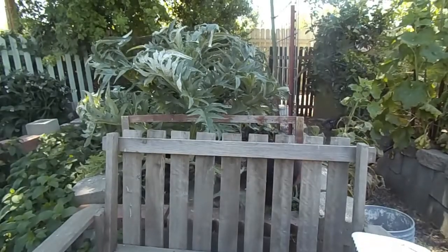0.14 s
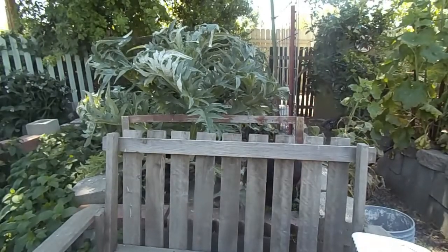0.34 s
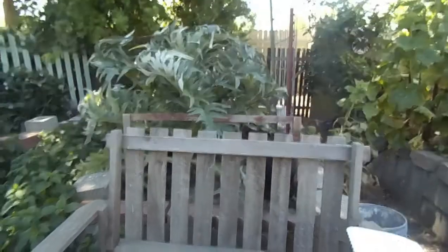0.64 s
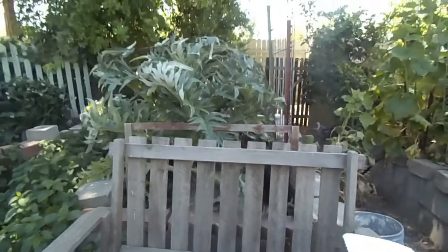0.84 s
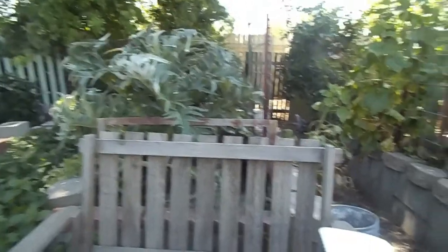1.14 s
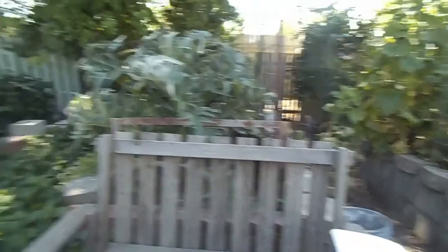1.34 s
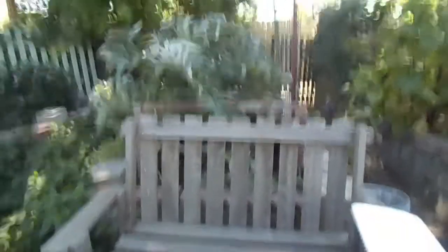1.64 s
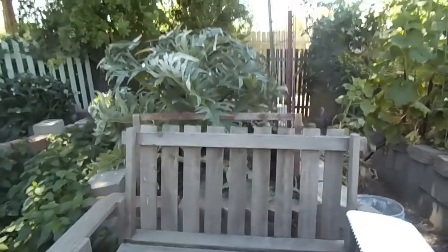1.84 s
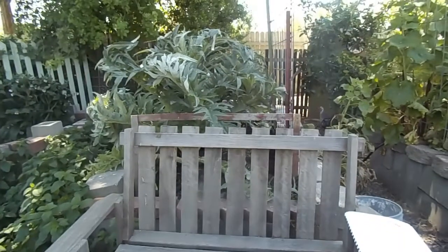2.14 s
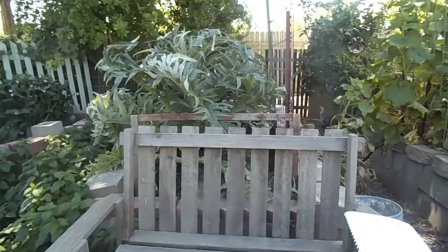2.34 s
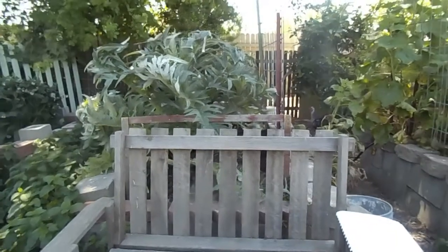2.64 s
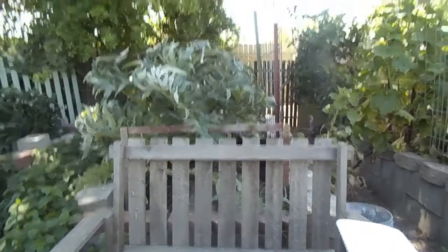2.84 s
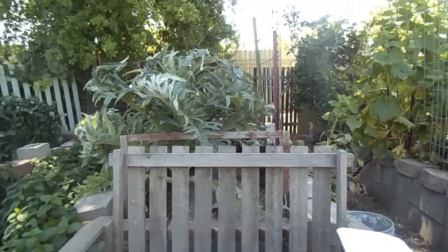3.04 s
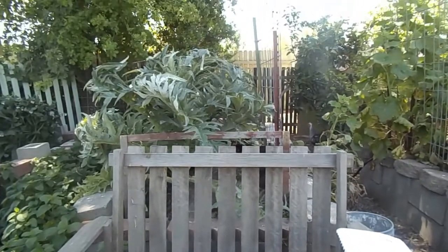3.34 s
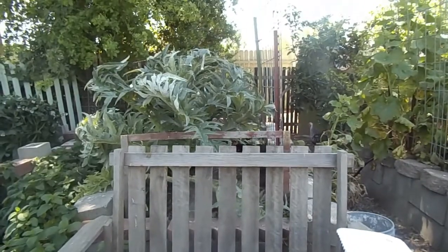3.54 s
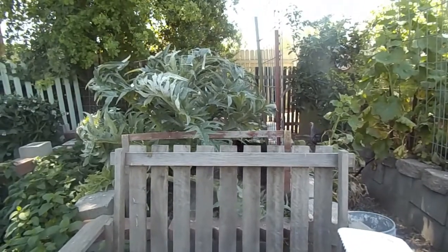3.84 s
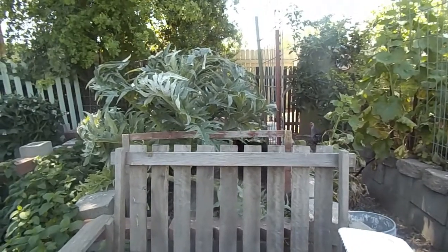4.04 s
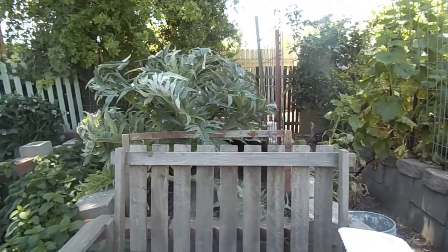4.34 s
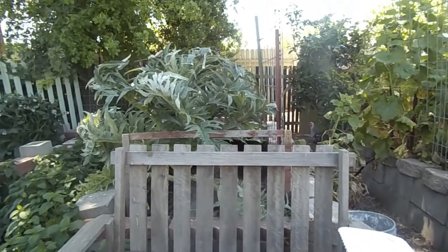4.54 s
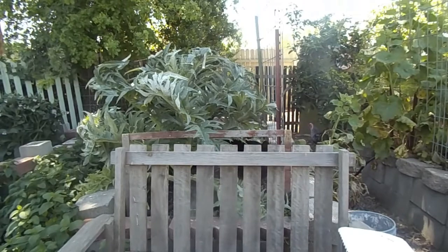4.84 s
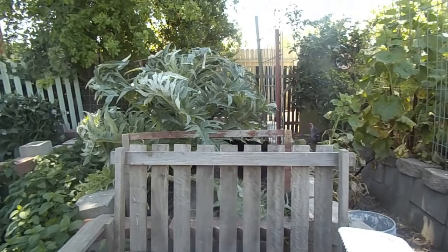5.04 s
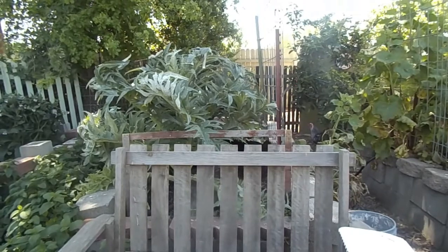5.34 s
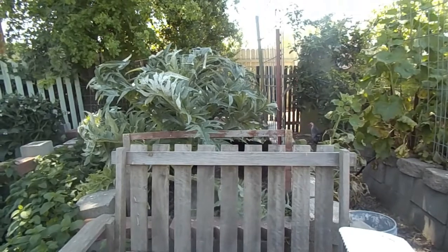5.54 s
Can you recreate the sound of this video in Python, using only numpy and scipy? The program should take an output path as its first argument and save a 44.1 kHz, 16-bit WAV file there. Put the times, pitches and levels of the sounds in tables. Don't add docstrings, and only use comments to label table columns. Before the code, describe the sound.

In a small fenced garden, a hen gives four quickening clucks, then a loud squawk near one second. Handling knocks, thumps and rubbing crowd the microphone around 1.5 seconds. More clucks follow at a steady pace, growing firmer, up to a second long squawk at about 4.6 seconds, then near quiet and one weak cluck. Soft distant traffic hum, leaf hiss and short wall echoes.

```python
import sys
import numpy as np
from scipy import signal
from scipy.io import wavfile
from scipy.ndimage import uniform_filter1d

SR = 44100
rng = np.random.default_rng(int(sys.argv[2]) if len(sys.argv) > 2 else 0)


def ratio_of_db(decibels):
    return 10 ** (np.asarray(decibels, float) / 20)


def waveform_to_disk(signal):
    frames = np.transpose(np.atleast_2d(signal))
    scaled = np.clip(frames, -1, 1) * 32767
    samples = np.round(scaled).astype(np.int16)
    wavfile.write(sys.argv[1], SR, samples)


N = 251370

# (frequency [Hz], level [dB])
HUM_SPECTRUM = [(15, -47), (25, -12), (64, -9), (195, -13), (439, -3), (503, -2.5), (1070, 0.5),
                (1440, -16), (1840, -2), (2160, -11), (3920, -16), (14800, -20.5), (16000, -25)]
HUM_DB, LEAVES_DB, WIND_DB, RUB_DB = -56, -69.5, -83.5, -80
# (peak time [s], rise [s], fall [s], level above calm [dB])
WIND_GUSTS = [
    (.55, 0.12, .55, 24.5),
    (1.55, 0.31, .28, 28.5),
    (1.95, 0.22, 0.72, 25),
    (3.7, 0.63, 0.089, 3),
]
# (peak time [s], rise [s], fall [s], level above calm [dB])
LEAF_SHIVERS = [
    (1.47, .9, 0.17, 5),
    (3.7, 0.29, 0.09, 19.5),
    (2.4, 0.2, 2.3, -19),
    (5.54, 0.95, 0.32, -13),
]
# (peak time [s], rise [s], fall [s], level above calm [dB])
SKIN_RUBS = [
    (1.54, 0.059, .04, 39),
    (1.61, 0.067, 0.084, 34.5),
    (2.58, 0.019, .03, 25),
    (3.7, 0.052, 0.11, 28),
]

# (time [s], peak level [dB], frequency [Hz])
GRIP_THUMPS = [(0.409, -45, 316), (0.533, -38, 133.8), (0.598, -41, 297), (0.779, -41, 212),
               (1.02, -36, 202), (1.349, -48, 79.4), (1.543, -35, 196), (1.553, -25.5, 299),
               (1.59, -29, 183), (1.607, -44, 290), (1.87, -34.5, 183), (1.91, -36.5, 169),
               (1.959, -43, 129.6), (2.098, -42, 153), (2.18, -41.5, 116), (2.557, -58, 239),
               (3.282, -35, 119), (3.4, -48, 290.3)]
# (time [s], peak level [dB], hollow ring [dB], high ring [dB], crack [dB])
LONE_KNOCKS = [(0.157, -32.5, -40, 6.5, -16), (0.41, -38.5, 2, -3.5, 7), (0.5293, -35, 5, 4, -23),
               (1.0244, -29.5, -5, -4, -10), (2.295, -31.5, -36, 1.5, -32), (2.39, -39.5, -26, 4.5, 15.5),
               (2.4076, -48, -11, 10, -27), (2.5094, -37, -14, 1.5, -6), (2.5525, -23, -25, -6.5, -13),
               (2.5735, -22, -7, 1.5, -3), (2.6366, -25, -36, -12, -35), (3.1792, -44, -7, -2, -22),
               (3.274, -33, 2, 4.5, -16), (3.3991, -25.5, -2.5, 3.5, -18), (3.4306, -39, 3.5, 6.5, -9),
               (3.5316, -37.5, -4, 0, -18), (4.0164, -41.5, -12, -21, -4), (4.0402, -42, -24, -14, -20),
               (4.366, -35.5, -26, -14, -14), (5.035, -36.5, -5, -35, -29), (5.1148, -36.5, -17, -18, -16),
               (5.1416, -43, -6, -15, -9), (5.5573, -42, -11, -13, -19), (5.6702, -41, -8, -21, -18)]
# (time [s], peak level [dB], firmness of the hold [dB])
FUMBLE_KNOCKS = [(1.4326, -35, -10), (1.528, -30, -8), (1.538, -23, 2), (1.5503, -24, 5),
                 (1.5744, -23.5, -1), (1.5883, -24, -2.5), (1.6047, -23, -5), (1.6276, -32, 0),
                 (1.6531, -30.5, 19), (1.716, -37.5, 6), (1.7343, -39, 0), (1.7687, -47, -5)]
# hollow ring, high ring, crack [dB]
FUMBLE_PART_DB = [-10.5, -8, -14.5]
# hollow ring, high ring, crack [dB/dB]
HOLD_DAMPING = [0.79, 1, 0.89]
# (frequency [Hz], level [dB], t60 [s])
CASING_MODES = [
    [(1283, 2.5, 0.028), (1545, 6, 0.01), (1080, -47, 0.042)],
    [(523, -12.5, 0.041), (765, -4, 0.014), (333, -13, 0.012)],
    [(2900, 2.5, 0.012), (3460, -11, 0.022), (2310, -0.5, 0.011)],
]

# (time [s], pitch [Hz], level [dB])
FAR_HEN_NOTE = [
    (1.78, 456, -67),
    (1.82, 502, -69),
    (1.88, 530, -62.5),
    (1.96, 510, -69),
    (1.98, 505, -83),
]
# (time [s], pitch [Hz], level [dB], hoarseness [0-1.2])
BIRD_CALLS = [
    [(0, 4560, -63, 0.07), (.14, 4700, -67, 0.25), (.24, 4940, -61, 0.15), (.31, 5220, -59, 0.22),
     (.36, 5180, -78, 0.2)],
    [(5.178, 2460, -73, 0.96), (5.19, 2900, -48, 1), (5.205, 2900, -54, 1.18), (5.216, 4220, -56.5, 0.84),
     (5.232, 5840, -54, 0.7), (5.245, 6800, -70, 0.7)],
]

# (start [s], peak level [dB], highest second partial [Hz], beak opening [dB], half-pitch share [0-1])
CLUCK_CALLS = [(-0.012, -32, 1168, -6.5, 0.8), (0.243, -27, 1155, -12, 0.34),
               (0.4851, -26.5, 1113, -18, 0.24), (0.7144, -21.5, 1196, -2.5, 0.45),
               (1.977, -36, 1188, -0.5, 0.74), (2.4233, -31.5, 1161, 3.5, 1),
               (2.7267, -26.5, 1120, 2.5, .69), (2.974, -24.5, 1143, 2.5, 0.8),
               (3.2991, -25.5, 1128, 5, 0.41), (3.5544, -22, 1135, 9, 0.08), (3.8312, -25, 1137, 9, .42),
               (4.1201, -25.5, 1102, 4, 0.45), (4.463, -25, 1078, 1.7, 0.23), (5.5861, -38, 1154, -4, 0.2)]
# (share of length [0-1], pitch re highest [ratio], level [dB], extra level of upper bands [dB])
CLUCK_ARCH = [
    (0, .78, -18.5, -67),
    (0.117, .88, -6.5, -13),
    (0.347, 1, -2, -0.5),
    (.6, 1.005, 2, -2),
    (0.85, 0.96, -8.5, -1),
    (1, 0.757, -3.5, -3),
]
# (frequency [Hz], level [dB])
CLUCK_THROAT_DB = [(560, -23), (800, -10), (1120, 5), (1450, -1), (1700, -7), (1950, -5), (2250, 9),
                   (2800, -17), (3200, -18), (3600, -13), (4300, -35), (6000, -39), (10000, -42.5),
                   (15500, -55.5)]
CLUCK_BAND_EDGES_HZ = [1330, 1900, 2600, 4200]
# (level re peak [dB], per opening [dB/dB], at full half-pitch [dB], per effort [dB/dB])
CLUCK_UPPER_BANDS = [(-16, 0.31, 10.5, 0.44), (-10.5, 1.0, 0.5, 0), (-16, -0.06, 8, 0.6),
                     (-17, 0.09, 4.9, 1.6)]
CLUCK_S, FULL_EFFORT_DB = 0.054, -24.5
FIRM_ROUGH, ROUGH_PER_WEAK_DB, WEAK_DB = 0.09, 0.06, -30

# (time [s], pitch [Hz], level [dB], beak opening [dB], neck slack [dB])
SQUAWK_BODIES = [
    [(.827, 670, -24, 4, 4.5), (.837, 749, -18.5, -7.5, 2.5), (.874, 735.4, -23, -1, 5.5),
     (.91, 665.2, -19.5, -6.5, -3.5), (.965, 671, -21.5, -1.5, 0), (1.01, 677.7, -24, 5.5, -16),
     (1.055, 676.7, -27, 10, -7), (1.095, 700, -25, -5, 7), (1.12, 670, -29, 4.5, 4.5)],
    [(4.592, 667, -25.5, -0.5, 3.5), (4.61, 720.6, -24, 1.5, -4.5), (4.664, 666.5, -30, 4.5, 5),
     (4.7, 690.3, -18.5, 0, 5), (4.745, 659.3, -28, 2, -17), (4.796, 678.7, -26.5, 13.5, 4),
     (4.825, 689.5, -28, 7.5, 4.5), (4.862, 711.3, -28.5, -5, 8.5), (4.885, 700, -28, 4, 1)],
]
# (length [s], roughness [0-1], half-pitch share [0-1], roughness at snap [0-1], snap [s])
SQUAWK_RASPS = [
    (.066, .15, .17, .2, .018),
    (.072, .1, 1, .4, .009),
]
# (frequency [Hz], level [dB])
SQUAWK_THROAT_DB = [(340, -63), (680, -31.5), (1030, -12.5), (1360, -2), (1700, -20.5), (2050, -11.5),
                    (2400, -17.5), (2750, 10), (3050, -9), (3500, -9.5), (4500, -14), (6300, -14.5),
                    (9500, -18.5), (16200, -28.5)]
SQUAWK_EDGE_RATIOS = [1.7, 2.3, 3.65, 4.5, 5.5]
# (level re second partial [dB], per opening [dB/dB], per slack [dB/dB], at full half-pitch [dB])
SQUAWK_PARTIAL_BANDS = [(-22.5, 0.5, 1.01, 22), (-11, 1.0, 0.5, 8.5), (-13, 0, 1.5, 5),
                        (-16, 1.0, -0.24, -5), (-7.5, 0.2747, 0, -0.5)]
ONSET_S, ONSET_PITCH_RATIO, ONSET_DB = 0.022, 0.83, -27
FALL_S, FALL_BREAK_SHARE, FALL_PITCH_RATIO, FALL_BREAK_DB, FALL_DB = 0.035, 0.64, 0.71, -3.5, -28
ONSET_ROUGH, CLEAR_ROUGH, FALL_ROUGH, SETTLE_S = 0.6, 0.03, 0.35, 0.012

# (delay [s], level [dB])
YARD_ECHOES = [(0.012, -9.5), (0.025, -11.5), (0.035, -11), (0.045, -15.5), (0.061, -28), (.079, -22),
               (.1, -40.5), (0.123, -30)]
YARD_T60_S, YARD_DB, WALL_CUT_HZ = 0.5, -26, 5200
MIC_CUTOFF_HZ = 16050


def rms_one(x):
    return x / np.sqrt(np.mean(x ** 2) + 1e-20)


def peak_one(x):
    return x / np.abs(x).max()


def at_hz(points, hz):
    points_hz, points_db = np.array(points).T
    return np.interp(np.log(hz), np.log(points_hz), points_db)


def in_span(rows):
    s, *columns = np.transpose(rows)
    at = max(int(s[0] * SR), 0)
    t = np.arange(at, int(s[-1] * SR)) / SR
    return at, t, [np.interp(t, s, c) for c in columns]


def add(out, at, x):
    out[at:at + len(x)] += x[:len(out) - at]


def drift(rate_hz, size):
    r = np.exp(-2 * np.pi * rate_hz / SR)
    noise = rng.standard_normal(size + 4000)
    return rms_one(signal.lfilter([1], [1, -2 * r, r * r], noise)[4000:])


def band(x, low_hz, high_hz):
    return signal.sosfilt(signal.butter(2, [low_hz, high_hz], "band", fs=SR, output="sos"), x)


def noise_band(low_hz, high_hz):
    return rms_one(band(rng.standard_normal(N), low_hz, high_hz))


def ring(clicks, hz, t60_s):
    r, w = ratio_of_db(-60 / (t60_s * SR)), 2 * np.pi * hz / SR
    return signal.lfilter([0, np.sin(w)], [1, -2 * r * np.cos(w), r * r], clicks + 1e-18)


def swells(calm_db, rows):
    t = np.arange(N) / SR
    return calm_db + sum(np.interp(t, [s - rise, s, s + fall], [0, db, 0]) for s, rise, fall, db in rows)


def hum():
    out = np.zeros(N)
    edges_hz = 22 * 2 ** np.arange(0, 9.6, 0.5)
    white = rng.standard_normal((2, N))
    for k, (low, high) in enumerate(zip(edges_hz, edges_hz[1:])):
        flicker = np.repeat(drift(300, N // 50 + 1), 50)[:N]
        level_db = at_hz(HUM_SPECTRUM, np.sqrt(low * high)) + 1.5 * flicker
        out += ratio_of_db(level_db) * band(white[k % 2], low, high)
    return ratio_of_db(HUM_DB) * rms_one(out)


def background():
    leaves = ratio_of_db(swells(LEAVES_DB, LEAF_SHIVERS)) * noise_band(3000, 14700)
    wind = ratio_of_db(swells(WIND_DB, WIND_GUSTS) + 5.4 * drift(4.6, N)) * noise_band(18, 270)
    rub = ratio_of_db(swells(RUB_DB, SKIN_RUBS) + 4 * drift(90, N)) * noise_band(230, 2500)
    return hum() + leaves + wind + rub


def thumps():
    out, t = np.zeros(N), np.arange(int(0.08 * SR)) / SR
    for s, db, hz in GRIP_THUMPS:
        push = t / 0.0042 * np.exp(1 - t / 0.0023)
        add(out, int(s * SR), ratio_of_db(db - 2) * np.sin(2 * np.pi * hz * t) * push)
    return out


def knocks():
    out, t = np.zeros(N), np.arange(2000) / SR
    damping = np.array(HOLD_DAMPING)
    fumble = [(s, db, *(FUMBLE_PART_DB - hold_db * damping)) for s, db, hold_db in FUMBLE_KNOCKS]
    rows = LONE_KNOCKS + fumble
    chance = rng.standard_normal((len(rows), 3, 3, 2))
    for (s, db, low_db, high_db, crack_db), grips in zip(rows, chance):
        contact = rng.standard_normal(len(t)) * (np.exp(-t / 0.0012) + 0.18 * np.exp(-t / 0.0096))
        crack = rng.standard_normal(len(t)) * ratio_of_db(-60 * t / 0.012)
        tick = ratio_of_db(crack_db) * peak_one(band(crack, 4000, 18000))
        for modes, group_db, grip in zip(CASING_MODES, [0, low_db, high_db], grips):
            rings = np.zeros(len(t))
            for (hz, mode_db, t60_s), (tune, strength) in zip(modes, grip):
                rings += ratio_of_db(mode_db + 2 * strength) * ring(contact, hz * np.exp(0.03 * tune), t60_s)
            tick += ratio_of_db(group_db) * peak_one(rings)
        add(out, int(s * SR), ratio_of_db(db) * tick)
    return band(out, 440, 22000)


def far_hen():
    out = np.zeros(N)
    at, t, (hz, level_db) = in_span(FAR_HEN_NOTE)
    phase = 2 * np.pi * np.cumsum(hz * (1 + 0.017 * drift(60, len(t)))) / SR
    partials = sum(ratio_of_db(db) * np.sin(k * phase) for k, db in enumerate([-25, 8.5, 1.5, 1, 6.5], 1))
    add(out, at, ratio_of_db(level_db) * partials)
    return out


def small_bird():
    out = np.zeros(N)
    for rows in BIRD_CALLS:
        at, t, (hz, level_db, hoarse) = in_span(rows)
        phase = 2 * np.pi * np.cumsum(hz * (1 + 0.1 * hoarse * drift(400, len(t)))) / SR
        add(out, at, ratio_of_db(level_db) * (1 + hoarse * drift(300, len(t))) * np.sin(phase))
    return out


def syrinx(t, hz, bands_db, rough, half, throat, edges_hz, wander_db):
    hz = hz * (1 + 0.0016 * drift(55, len(t)) + 0.016 * rough * drift(270, len(t)))
    phase = np.pi * np.cumsum(hz) / SR
    groups = np.zeros((len(bands_db), len(t)))
    blur = [drift(91, len(t)) for _ in range(6)]
    for k in range(1, int(32400 / np.median(hz))):
        partial_hz = k * hz / 2
        shake_db = wander_db * np.sin(2 * np.pi * (rng.uniform(4, 12) * t + rng.random()))
        strength = ratio_of_db(at_hz(throat, partial_hz) + shake_db) * (partial_hz < 16200)
        if k % 2:
            strength = strength * half
        spread = 2 * np.pi if k < 11 else 2.0
        jitter = (1.4 * rough + (0.014 + 0.22 * rough) * k) * blur[k % 6]
        wave = np.sin(k * phase + spread * rng.random() + jitter)
        partial = strength * (1 + 1.4 * rough * blur[(k + 3) % 6]) * wave
        above = [1] + [np.clip((partial_hz / e - 1) * 8 + 0.5, 0, 1) for e in edges_hz] + [0]
        for g in range(len(groups)):
            groups[g] += (above[g] - above[g + 1]) * partial
    groups /= np.sqrt(uniform_filter1d(groups ** 2, size=700, axis=1) + 1e-9)
    edge = np.clip(np.minimum(t - t[0], t[-1] - t) / 0.0019, 0, 1)
    return edge * np.sum(ratio_of_db(np.array(bands_db)) * groups, axis=0)


def cluck(s, db, hz, beak_db, half):
    arch = [(s + CLUCK_S * share, *rest) for share, *rest in CLUCK_ARCH]
    at, t, (bend, level_db, late_db) = in_span(arch)
    level_db = level_db + db - 4.0
    effort_db = min(db - FULL_EFFORT_DB, 0)
    half = np.clip(half, 0, 1)
    bands_db = [level_db]
    for k, (base, opens, halves, push) in enumerate(CLUCK_UPPER_BANDS):
        band_db = base + opens * beak_db + halves * half + push * effort_db
        bands_db.append(level_db + band_db + 0.71 * k * late_db)
    rough = FIRM_ROUGH + ROUGH_PER_WEAK_DB * max(WEAK_DB - db, 0)
    voice = syrinx(t, bend * hz / 2, bands_db, rough, half, CLUCK_THROAT_DB, CLUCK_BAND_EDGES_HZ, wander_db=5.5)
    return at, voice


def squawk(body, rasp):
    (s, hz, db, *pose), (end, end_hz, end_db, *_) = body[0], body[-1]
    fall_hz = end_hz * FALL_PITCH_RATIO
    rows = [(s - ONSET_S, hz * ONSET_PITCH_RATIO, db + ONSET_DB, *pose),
            *body,
            (end + FALL_S * FALL_BREAK_SHARE, fall_hz, end_db + FALL_BREAK_DB, 0, 0),
            (end + FALL_S, fall_hz * 1.4, end_db + FALL_DB, 0, 0)]
    at, t, (hz, db, beak_db, slack_db) = in_span(rows)
    length_s, rasp_rough, rasp_half, snap_rough, snap_s = rasp
    clear = s + length_s
    stages = [s - ONSET_S, s + SETTLE_S, clear - SETTLE_S / 2, clear + SETTLE_S / 2,
              clear + snap_s, end - SETTLE_S / 2, end + FALL_S]
    rough = np.interp(t, stages, [ONSET_ROUGH, rasp_rough, rasp_rough, snap_rough,
                                  CLEAR_ROUGH, CLEAR_ROUGH, FALL_ROUGH])
    half = np.interp(t, stages, [0.6, rasp_half, rasp_half, 0.5 * rasp_half, 0.007, 0.007, 0.55])
    low, *upper = [db + base + opens * beak_db + slackens * slack_db + halves * half
                   for base, opens, slackens, halves in SQUAWK_PARTIAL_BANDS]
    edges_hz = np.outer(SQUAWK_EDGE_RATIOS, hz)
    return at, syrinx(t, hz, [low, db, *upper], rough, half, SQUAWK_THROAT_DB, edges_hz, wander_db=8.0)


def hen():
    out = np.zeros(N)
    for row in CLUCK_CALLS:
        add(out, *cluck(*row))
    for body, rasp in zip(SQUAWK_BODIES, SQUAWK_RASPS):
        add(out, *squawk(body, rasp))
    return signal.sosfilt(signal.butter(4, 430, "high", fs=SR, output="sos"), out)


def yard(x):
    size = int(YARD_T60_S * SR)
    n = np.arange(size)
    build_up = np.clip(n / SR / 0.026, 0, 1)
    tail = ratio_of_db(YARD_DB - 60 * n / size) * rng.standard_normal(size) * build_up / 30
    for delay_s, db in YARD_ECHOES:
        tail[int(delay_s * SR)] += ratio_of_db(db)
    tail = signal.sosfilt(signal.butter(1, WALL_CUT_HZ, fs=SR, output="sos"), tail)
    return x + signal.fftconvolve(x, tail)[:N]


def scene():
    ticks = knocks()
    airborne = yard(hen() + far_hen() + small_bird() + 0.065 * ticks)
    return (airborne + 0.94 * ticks + thumps() + background())[None]


def low_pass(x):
    return signal.sosfilt(signal.butter(12, 16670, fs=SR, output="sos"), x)


def record(dry):
    thin = signal.sosfilt(signal.butter(1, 50, "high", fs=SR, output="sos"), dry)
    mix = signal.sosfilt(signal.ellip(10, 0.5, 70, MIC_CUTOFF_HZ, fs=SR, output="sos"), thin)
    return low_pass(mix)


dry = scene()
out = record(dry)
waveform_to_disk(out)
```